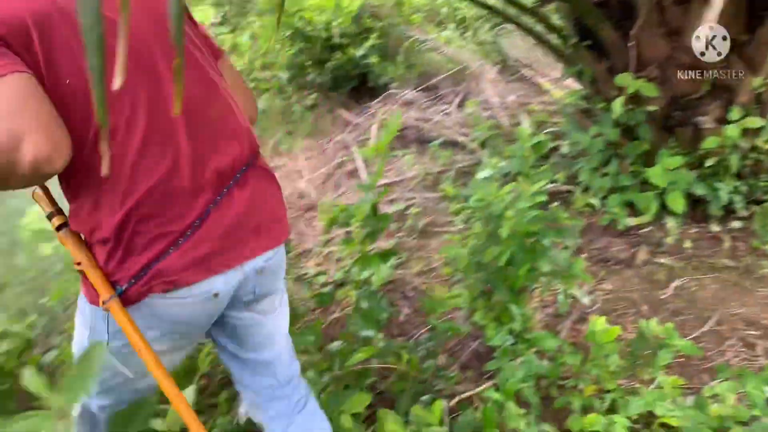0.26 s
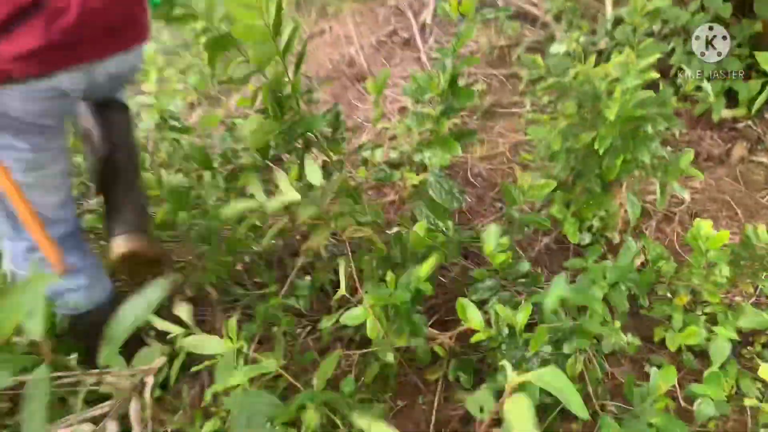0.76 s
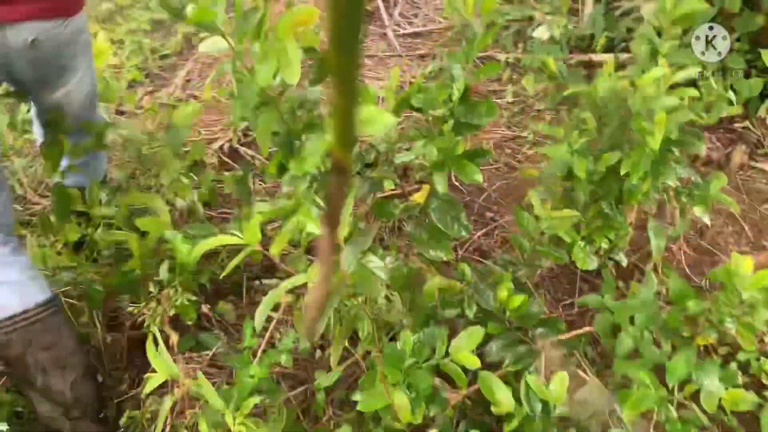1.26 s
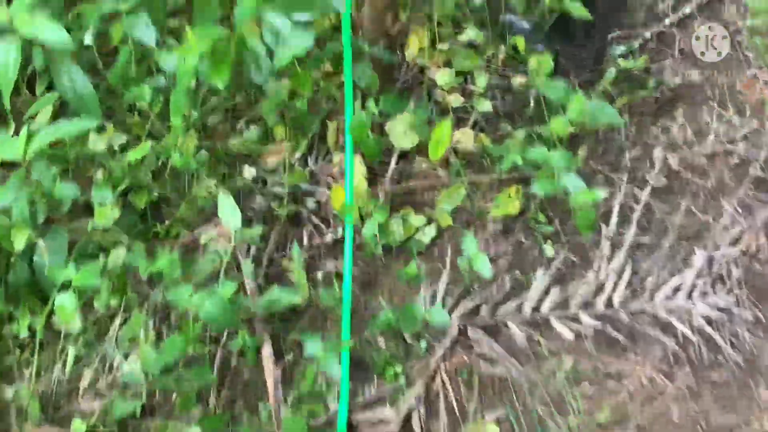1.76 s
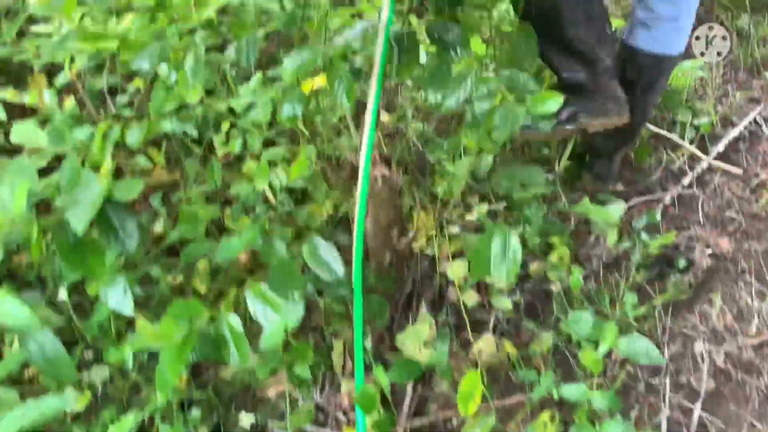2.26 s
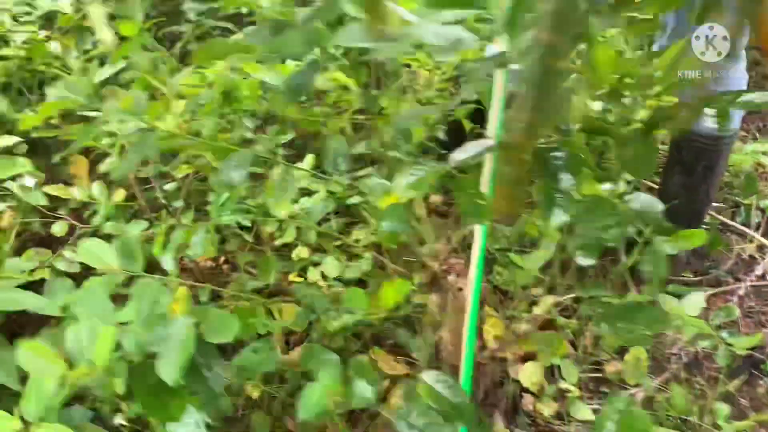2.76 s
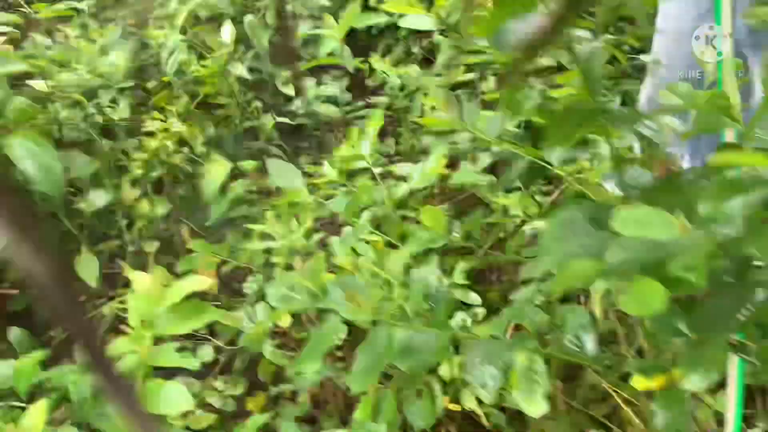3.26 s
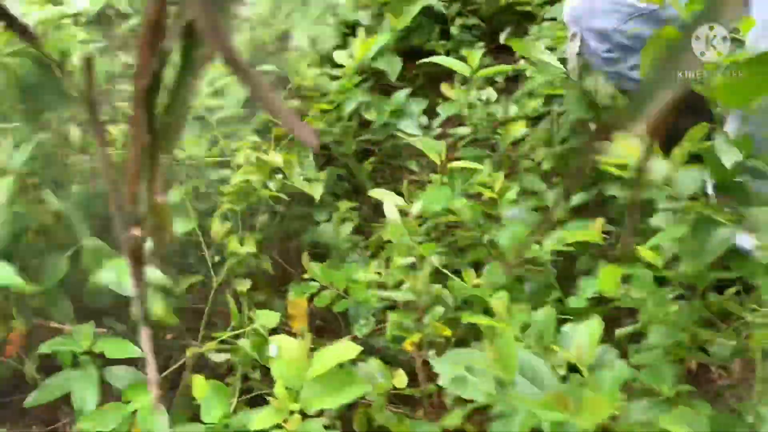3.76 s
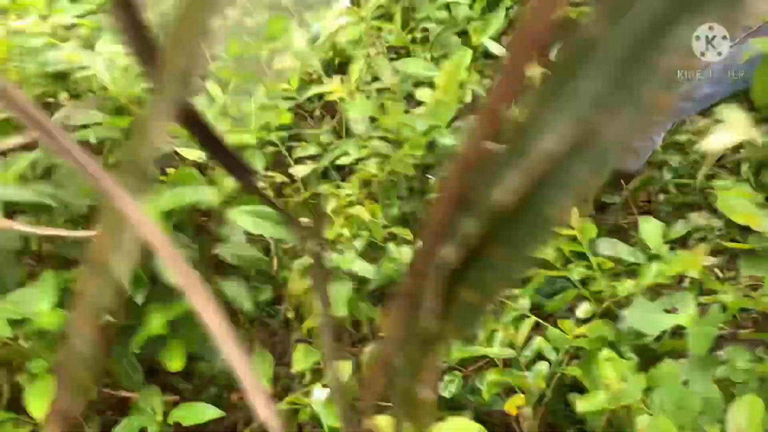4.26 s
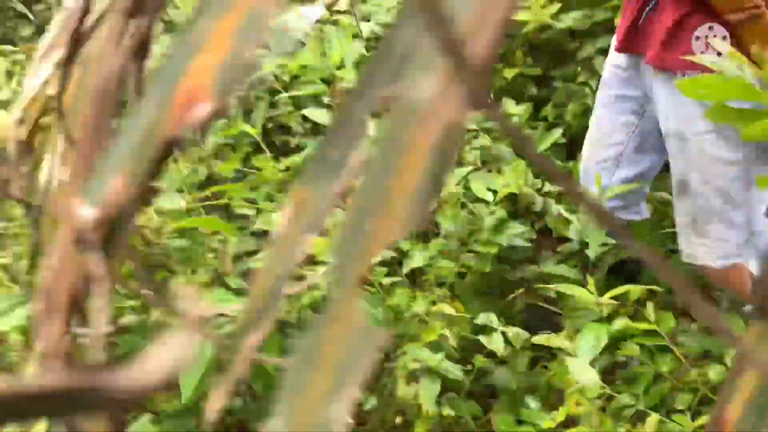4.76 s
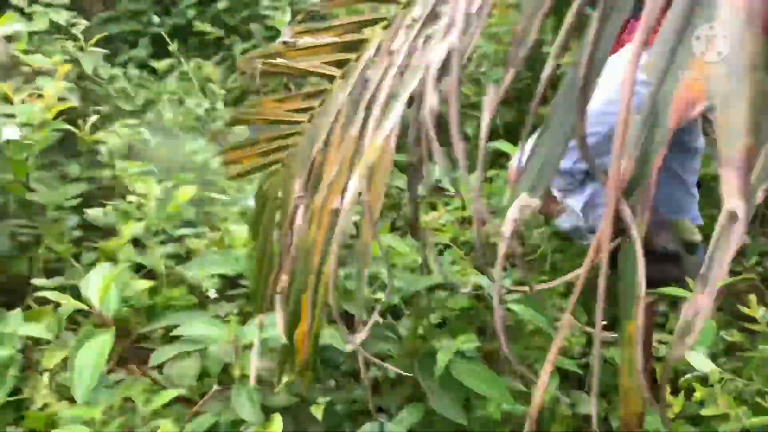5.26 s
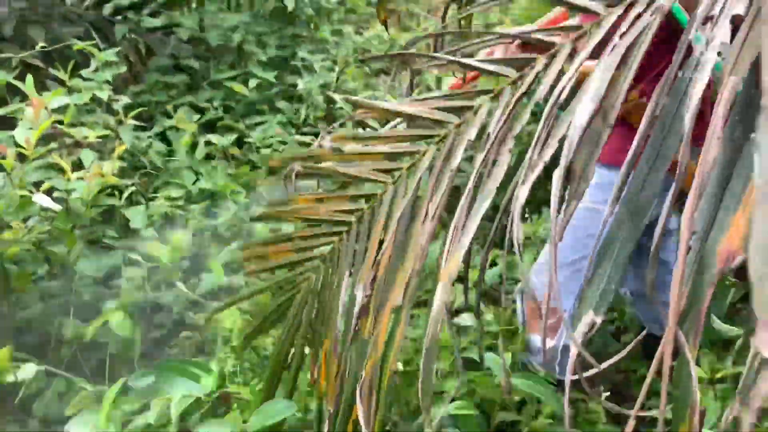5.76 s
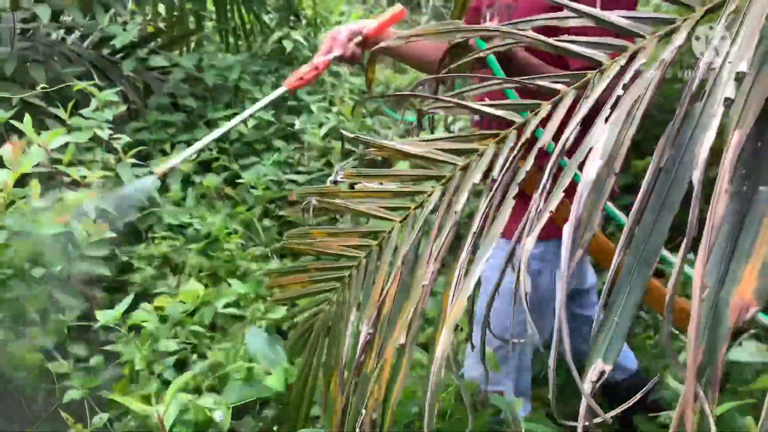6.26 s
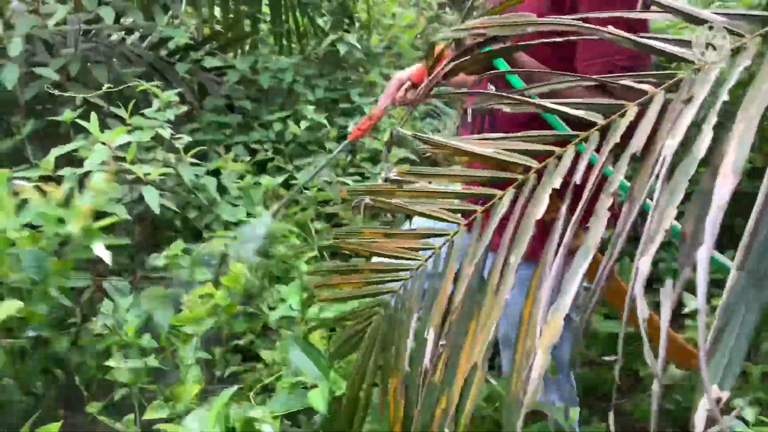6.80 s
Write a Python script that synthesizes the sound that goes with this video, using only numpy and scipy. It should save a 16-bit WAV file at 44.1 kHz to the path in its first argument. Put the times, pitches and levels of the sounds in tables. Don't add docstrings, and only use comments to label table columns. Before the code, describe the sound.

A spray gun hisses over weeds as dry twigs snap underfoot and a slow pump engine thuds far off, with a frond knocking the microphone.

```python
import sys
import numpy as np
from scipy import signal
from scipy.fft import rfft, irfft, next_fast_len
from scipy.io import wavfile
from scipy.ndimage import uniform_filter1d, map_coordinates

SR = 44100
rng = np.random.default_rng(int(sys.argv[2]) if len(sys.argv) > 2 else 0)


def linear_from_db(decibels):
    return 10 ** (np.asarray(decibels, float) / 20)


def put_to_file(sound):
    columns = np.atleast_2d(sound).T
    safe = np.clip(columns, -1, 1)
    whole_steps = np.round(safe * 32767)
    wavfile.write(sys.argv[1], SR, whole_steps.astype(np.int16))


N = 310023
T = np.arange(N) / SR


def along(points, hz):
    f, v = np.transpose(points)
    return np.interp(np.log(hz + 1), np.log(f + 1), v)


def curves(rows):
    s, *cols = np.transpose(rows)
    return [np.interp(T, s, c) for c in cols]


def unit(x):
    return x / np.sqrt(np.mean(x ** 2) + 1e-20)


def wobble(rate):
    return map_coordinates(rng.standard_normal(int(N * rate / SR) + 4), [T * rate])


def swells(rows):
    slow_s = T[::64]
    lift_db = sum(db * np.exp(-((slow_s - s) / width) ** 2 / 2) for s, db, width in rows)
    return np.interp(T, slow_s, lift_db)


def filtered(x, response):
    m = next_fast_len(x.shape[-1] + 4096)
    return irfft(rfft(x, m) * response(np.fft.rfftfreq(m, 1 / SR)), m)[..., :x.shape[-1]]


def rush(spectrum, patchy_db, grit_db, spread=1):
    # frequency in Hz, correlation [-1..1].
    alike = [(100, 0.44), (800, 0.63), (2000, 0.47), (3200, 0.1), (5500, 0.62), (6900, 0.53), (8000, 0.95),
             (16000, 1)]
    pair = rng.standard_normal((2, N)) * linear_from_db(grit_db * wobble(900))
    z = signal.stft(pair, nperseg=512)[2]
    field = uniform_filter1d(rng.standard_normal(z.shape[1:]), 8, 0)
    field = uniform_filter1d(field, 10, 1)
    pair = signal.istft(z * linear_from_db(patchy_db * unit(field)), nperseg=512)[1][:, :N]

    def mid_side(hz):
        angle = np.arccos(np.clip(along(alike, hz), -1, 1)) / 2
        colour = linear_from_db(along(spectrum + [(SR / 2, -120)], hz))
        return colour * [np.cos(angle), np.sin(angle)]

    mid, side = filtered(pair, mid_side)
    return unit(np.array([mid + spread * side, mid - spread * side]))


def rings(rows, attack_s):
    t = np.arange(SR // 10) / SR
    attack = 1 - np.exp(-t / attack_s)
    out = np.zeros(N + len(t))
    for s, db, hz, t60 in rows:
        out[round(s * SR):][:len(t)] += linear_from_db(db - 60 * t / t60) * np.sin(2 * np.pi * hz * t) * attack
    return out[:N]


def mist(sweep_db, flutter):
    # frequency in Hz, level in dB.
    colour = [(3500, -24.5), (5500, -9.5), (7000, -2.5), (8500, -1), (11000, -2), (14000, -2), (15700, -2)]
    # time in seconds, mist level in dB.
    nozzle = [(0, -38), (1.4, -38.5), (1.72, -36), (2.7, -35.5), (3.4, -35.5), (4.8, -34.5), (5.9, -34.5),
              (7.03, -33.5)]
    level_db = curves(nozzle)[0] + sweep_db + 2.5 + 0.49 * flutter
    return linear_from_db(level_db) * rush(colour, patchy_db=1.36, grit_db=1.0)


def leaves(sweep_db, brush_db, flutter):
    # frequency in Hz, level in dB.
    colour = [(500, -12), (1200, -12), (2500, -2), (4200, 0.5), (6000, -3), (7500, 0.5), (10000, -24)]
    # time in seconds, side gain (ratio).
    spread = [(0, .75), (1.3, .85), (1.45, 1.4), (2, 1), (6, 1), (6.06, .3), (6.6, .32), (6.7, .6),
              (6.85, .5), (6.97, 1)]
    level_db = -41 + 0.56 * sweep_db + 0.52 * brush_db + 1.53 * flutter
    return linear_from_db(level_db) * rush(colour, patchy_db=1.5, grit_db=1.5, spread=curves(spread)[0])


def wash(sweep_db, brush_db):
    # frequency in Hz, level in dB.
    colour = [(30, -11), (60, 9), (150, 3.5), (260, 1), (480, -11), (750, -7), (1300, -6), (2500, -11.5)]
    # time in seconds, lift in dB, width in seconds.
    hush = (5.11, -11.5, 0.094)
    # time in seconds, lift in dB, width in seconds.
    lulls = [
        (1.6, 4.5, .05),
        (6.55, -2, 0.4),
    ]
    level_db = -45 + 0.27 * sweep_db + 0.68 * brush_db + swells([hush, *lulls])
    return linear_from_db(level_db) * rush(colour, patchy_db=2.0, grit_db=2.0)


def spray():
    # time in seconds, lift in dB, width in seconds.
    sweeps = [(.15, 1, 0.082), (.5, -5.5, 0.1), (.8, -2, 0.063), (1.07, 5.5, 0.029), (1.95, 4, 0.072),
              (2.1, -2.5, 0.072), (2.42, 2, 0.15), (2.92, 2.5, 0.087), (3.22, 3.5, 0.12), (3.73, 7.5, 0.12),
              (4.1, 2.5, 0.07), (4.47, 6.5, 0.12), (4.93, -4, 0.098), (5.6, 2.5, 0.08), (6.35, 2.5, 0.066),
              (7.0, 2.5, 0.066)]
    # time in seconds, lift in dB, width in seconds.
    brush = [(.1, 3, 0.017), (.87, 9, 0.12), (1.15, 0, .12), (1.48, -3, 0.036), (1.85, 2.5, .15),
             (2.47, 2.5, 0.081), (3.03, 5.5, 0.075), (3.35, 2.5, 0.031), (3.75, 5, 0.13), (4.47, 0.5, 0.1),
             (4.75, 4.5, 0.31), (5.17, 4, 0.1), (5.55, 2, 0.15), (6.2, -1, 0.11)]
    sweep_db, brush_db = swells(sweeps), swells(brush)
    flutter = wobble(14)
    return mist(sweep_db, flutter) + leaves(sweep_db, brush_db, flutter) + wash(sweep_db, brush_db)


def engine():
    # first firing in seconds, firings per second.
    firing = [
        (-.0055, 14.42),
        (1.5578, 14.438),
    ]
    # time in seconds, thump peak in dB, left minus right in dB.
    loudness = [(0, -23, 0.5), (1.4, -23.5, 0.5), (1.7, -24.5, -5), (3.5, -25, -4), (5.1, -27, -6),
                (5.5, -25.5, -5.5), (7.03, -27, -5.5)]
    # delay in ms, frequency in Hz, length in ms, level in dB.
    pulses = [(-15, 169, 4.7, -18), (1.5, 99.7, 4.87, -1), (15.5, 96, 5.5, -10.5), (7.5, 142.6, 14, -9.5),
              (30, 124, 7.6, -32), (2, 217, 45, -30)]
    t = np.arange(-1300, 3300) / SR
    thump = np.zeros(len(t))
    for ms, hz, long_ms, db in pulses:
        bell = np.exp(-((t * 1000 - ms) / long_ms) ** 2 / 2)
        thump -= linear_from_db(db) * bell * np.cos(2 * np.pi * hz * (t - ms / 1000))
    count = np.arange(90)
    (first_s, rate_hz), (again_s, rate_after_hz) = firing
    times_s = np.r_[(first_s + count / rate_hz)[:23], again_s + count / rate_after_hz]
    chance = rng.standard_normal((len(times_s), 2))
    hunting_s = .0005 * np.sin(2 * np.pi * times_s * 3.3)
    at = np.round((times_s + hunting_s + .0003 * chance[:, 0]) * SR).astype(int) + 1300
    kicks = np.bincount(at, linear_from_db(0.41 * chance[:, 1]), N + 2 * SR)
    thuds = signal.fftconvolve(kicks, thump)[2600:2600 + N]
    level_db, pan_db = curves(loudness)
    return thuds * linear_from_db([level_db + pan_db / 2, level_db - pan_db / 2])


def litter():
    pick = rng.random((70, 4))
    return [(2.5 * s, -39 + 9 * size ** 2, 2000 + 4400 * pitch, -16, 8 * bright, -8)
            for s, size, pitch, bright in pick if abs(2.5 * s - 1.55) > .16]


def ticks():
    # start in seconds, peak in dB, frequency in Hz, t60 in seconds.
    stem_ticks = [(.1048, -18, 2600, .005), (.186, -24, 7500, .005), (.238, -20, 7600, 0.048),
                  (.2838, -24, 6500, .01), (.3282, -27, 7100, .012), (.4648, -26, 8000, .006),
                  (.58, -13, 7600, .004), (.7302, -7, 8200, .006), (.7467, -13, 8200, 0.0033),
                  (.8746, -1.5, 9500, .008), (.8833, -11, 4500, 0.0054), (.911, -21, 9000, .006),
                  (.9215, -28, 3800, 0.033), (.9403, -8.5, 4000, .006), (1.049, -24, 8000, .006),
                  (1.1603, -32, 8000, .006), (1.219, -18, 9500, .006), (1.5938, -33, 6000, .008),
                  (1.9098, -10, 6000, 0.0033), (1.61, -38, 5000, .005), (2.4085, -11, 4800, 0.0043),
                  (3.291, -7, 9800, .006), (3.369, -3, 9800, 0.018), (3.4725, -13, 10400, .004),
                  (4.0198, -18.5, 1200, 0.0058), (4.061, -22, 4500, .008), (4.104, -28.5, 1000, .01),
                  (4.13, -25, 2200, .008), (4.7183, -21, 1300, .012), (4.898, -20.5, 1900, .014),
                  (5.006, -31, 2500, .006), (5.083, -13, 9000, .004)]
    t = np.arange(1024) / SR
    out = np.zeros(N + len(t))
    noises = rng.standard_normal((len(stem_ticks), len(t)))
    for (s, db, hz, t60), noise in zip(stem_ticks, noises):
        puff = signal.lfilter(*signal.iirpeak(hz, 1.2, SR), noise * linear_from_db(-60 * t / t60))
        out[round(s * SR):][:len(t)] += linear_from_db(db) * puff / np.abs(puff).max()
    return out[:N]


def twigs():
    # start in seconds, peak in dB, pitch in Hz, wood in dB, crackle in dB.
    clean = [(0.245, -26.5, 4000, -17, 6), (0.2502, -24.5, 1840, -4, 0), (0.4649, -28.5, 5130, -3.5, 2),
             (0.5705, -30, 5230, -15, -1), (.579, -24, 5150, -24, 6), (.746, -16, 3680, -12.5, -0.5),
             (.8042, -29, 3610, -21, -12), (0.846, -27, 3490, -21, -7), (0.8825, -16.5, 2210, 0, 4.5),
             (0.9207, -15.5, 3200, -9, -12), (0.94, -17.5, 3250, -29, 1.5), (1.417, -29.5, 4340, -26, 4),
             (1.5926, -41, 6400, -29, -8), (1.992, -23.5, 4950, -28, 2), (2.0898, -27, 4730, -25, 3),
             (2.105, -25, 2850, -10, -9), (3.29, -27.5, 2370, -45, 8), (4.8962, -22, 1590, -1, -17),
             (5.0256, -24, 1890, -16, -16), (5.0454, -20.5, 1900, -26, -13), (5.082, -24.5, 5740, -28, 3),
             (5.134, -21, 6300, -29, -10), (5.198, -28, 5100, -18, -8), (5.218, -29, 6000, -23, -6)]
    # start in seconds, peak in dB, crackle in dB.
    stems = [(.299, -37, 11), (0.566, -29, -1), (.5849, -28, 2), (.728, -30, 12), (0.798, -40.5, 14.5),
             (1.0618, -33, 10.5), (1.198, -30, 7.5), (1.218, -30, 12), (1.227, -39, 13),
             (1.2700, -37.5, 10), (1.3816, -45.5, 19.5), (1.5013, -46, 7), (1.571, -49.5, 5),
             (2.0466, -33, 9.5), (2.097, -39, 10), (3.472, -43.5, 18), (4.1017, -29.5, 9.5)]
    # start in seconds, peak in dB, pitch in Hz, wood in dB.
    taps = [(0.3219, -24, 3310, -19), (1.0125, -29, 2320, -11), (1.0755, -32, 6420, -12),
            (1.6092, -44, 5440, -14), (1.755, -24, 4970, -21), (1.857, -31, 4730, -18),
            (2.036, -23.5, 5800, -20), (2.1538, -41, 5800, 4), (2.1894, -42, 5200, -15),
            (2.429, -37, 1810, 5), (2.4571, -32, 1760, 7), (2.474, -37, 4730, 5), (3.459, -31, 2560, -14),
            (3.699, -21, 4050, -24), (4.0173, -27.5, 1500, 2), (4.7165, -32, 1780, 7.5),
            (4.737, -37, 1820, 11), (5.445, -34.5, 1820, 6)]
    # start in seconds, peak in dB, pitch in Hz, wood in dB, crackle in dB.
    breaks = [(0.8746, -20.5, 3580, -1, 9.5), (1.706, -10.5, 4270, -43, -4), (1.9084, -11, 5880, -38, -12),
              (2.408, -17.5, 4730, -11, -10), (3.367, -17.5, 2320, -11, 3)]
    # delay in seconds, peak in dB, pitch in Hz, wood in dB, crackle in dB.
    after = [
        (.0065, -32, 4660, -22, 6.5),
        (0.0137, -38, 4800, -25, 8.5),
    ]
    rows = [(*row, 0.5) for row in breaks]
    rows += [(*row, -2.5) for row in clean]
    rows += [(row[0] + s, *rest, 8.5) for row in breaks for s, *rest in after]
    rows += [(s, db, 5520, -8, crackle_db, 2) for s, db, crackle_db in stems]
    rows += [(*row, -17, -3) for row in taps]
    return rows + litter()


def snaps():
    t = np.arange(SR // 8) / SR
    burst = (1 - np.exp(-t / 0.00037)) ** 2 * linear_from_db(-60 * t / 0.0091)
    wood, crack, crackle = np.zeros((3, 2, N + len(t)))
    for s, db, hz, wood_db, crackle_db, rustle_db in twigs():
        noise = rng.standard_normal((5, len(t)))
        grain_db = 1.7 * np.repeat(noise[3, ::40], 40)[:len(t)]
        splinters = linear_from_db(rustle_db - 7.0 - 60 * t / 0.055 + grain_db) * (t > .001)
        size = linear_from_db(db) * (burst + splinters)
        lag = round(2.5 * noise[3, 1])
        ports = lambda x: np.array([x, np.roll(x, lag)])
        ring = 4.7 * uniform_filter1d(noise[4], size=20) * np.cos(2 * np.pi * hz * t)
        at = slice(round(s * SR), round(s * SR) + len(t))
        wood[:, at] += linear_from_db(wood_db + 17.0) * ports(size * noise[0])
        crack[:, at] += linear_from_db(7.5) * ports(size * (1.15 * noise[1] + .5 * ring))
        crackle[:, at] += linear_from_db(crackle_db + 18.5) * size * noise[2]

    def band(lo_hz, hi_hz):
        return lambda hz: (1j * hz / lo_hz / (1 + 1j * hz / lo_hz)) ** 4 / (1 + 1j * hz / hi_hz) ** 4

    out = filtered(wood, band(305, 2660)) + filtered(crack, band(1230, 12200))
    return (out + filtered(crackle, band(7000, 16600)))[:, :N]


def pings():
    # start in seconds, peak in dB, frequency in Hz, t60 in seconds.
    wood_rings = [(.579, -18, 7400, .006), (.7285, -15, 7800, .006), (.7465, -23, 3700, .008),
                  (.8745, -9.5, 950, .012), (.8745, -18, 3600, .008), (.8817, -16, 2200, .01),
                  (.921, -27, 950, .03), (.9402, -9.5, 3200, .007), (1.07, -38, 1050, .05),
                  (1.143, -35, 950, .03), (1.162, -38, 850, .03), (1.178, -34, 900, .03),
                  (1.5935, -38, 4300, .008), (1.5935, -36, 6500, .008), (1.7065, -9, 2100, .009),
                  (1.7068, -13, 3450, .012), (1.7066, -9, 4400, .01), (1.9095, -17, 2000, .01),
                  (1.9095, -17, 4100, .01), (2.408, -21, 2800, .008), (3.29, -24, 2300, .008),
                  (3.3668, -14, 2000, .009), (3.3672, -15, 1400, .012), (3.4595, -27, 2800, .006),
                  (3.472, -20, 10300, .005), (5.082, -22, 6700, .006)]
    right = rings(wood_rings, attack_s=.0003)
    return np.array([np.roll(right, 7), right])


def drag():
    # peak time in seconds, peak in dB, rise and fall in seconds per 20 dB.
    rub = [(.925, -48, .03, .045), (1.19, -49, 0.22, 0.035), (1.348, -37.5, .006, 0.063),
           (2.43, -46, .04, .06), (2.48, -39, 0.072, 0.025), (4.723, -38, 0.0023, 0.056),
           (4.739, -31, 0.015, 0.037), (4.81, -33, .015, .05), (4.85, -38, 0.049, 0.043),
           (4.906, -19.5, 0.006, 0.0046), (5.03, -42.5, 0.039, 0.08), (5.09, -48, .08, .015)]
    # frequency in Hz, level in dB.
    colour = [(120, -32), (220, -5), (330, -8), (480, -14), (750, -22), (1300, -43), (3000, -42)]
    strokes = sum(linear_from_db(db - 20 * np.where(T < s, (s - T) / rise, (T - s) / fall)) for s, db, rise, fall in rub)
    return strokes * linear_from_db(4 * wobble(90)) * rush(colour, patchy_db=3, grit_db=3, spread=.5)


def shake():
    # time in seconds, level in dB.
    boom = [(4.717, -90), (4.72, -15.5), (4.78, -17), (4.8, -24), (4.87, -24), (4.89, -27), (4.915, -25),
            (4.93, -43), (4.94, -90)]
    # frequency in Hz, level in dB.
    colour = [(30, -35), (55, 11.5), (80, 7), (130, -3), (175, -1.5), (240, -19), (400, -64)]
    return linear_from_db(curves(boom)[0]) * rush(colour, patchy_db=1.5, grit_db=1.0, spread=0.71)


def handling():
    # start in seconds, peak in dB, frequency in Hz, t60 in seconds.
    knocks = [(1.295, -35, 250, .04), (1.347, -36, 650, .03), (2.457, -30, 288, .022),
              (3.367, -25.5, 213, .091), (3.643, -36, 284, .062), (4.7192, -10, 310, .018),
              (4.724, -15, 75, .15), (4.737, -16, 190, .052), (4.758, -16, 109, .14), (4.765, -19, 140, .1),
              (4.809, -18, 172, .05), (4.81, -30, 950, .02), (4.845, -28, 850, .03), (4.85, -28, 520, .04),
              (4.883, -26, 380, .03), (4.899, -12, 760, .05), (4.901, -15, 300, .035),
              (4.907, -9, 97, .065), (5.027, -28, 420, .03), (5.05, -33, 380, .03)]
    # start in seconds, peak in dB, frequency in Hz, t60 in seconds.
    more_knocks = [(2.424, -36, 447, 0.026), (2.435, -34, 700, .02), (2.4585, -24, 900, 0.013),
                   (2.469, -32, 600, .02), (2.475, -28, 650, .025), (2.484, -29, 850, 0.024),
                   (4.7195, -24, 805, 0.022), (4.738, -31, 900, .02), (4.745, -23, 560, .05),
                   (4.768, -21, 135, .12), (4.776, -36, 1150, .03), (4.826, -31, 620, .04),
                   (4.835, -36, 1300, .02), (4.856, -40, 540, .03), (4.88, -29, 500, .02),
                   (4.89, -28, 650, .02), (4.9, -20, 1350, .02), (4.901, -19.5, 594, 0.044),
                   (.8835, -24, 900, .012), (.875, -34, 544, .02), (4.906, -33, 330, 0.023)]
    lag_s = 16 / SR

    def case_to_ports(hz):
        low_cut = (1j * hz / (28 + 1j * hz)) ** 3
        return low_cut * np.exp(-1j * np.pi * hz * lag_s * np.array([[1], [-1]]))

    return filtered(drag() + shake() + rings(knocks + more_knocks, attack_s=.0001), case_to_ports)


def scene():
    # time in seconds, gain (ratio).
    fade = [(0, 0.87), (1.4, 0.79), (1.49, 0.099), (1.511, .04), (1.556, 0.048), (1.6, 0.22), (1.71, 0.71),
            (7.03, 1)]
    field = (spray() + engine() + handling()) * curves(fade)[0]
    return field + ticks() + snaps() + pings()


def low_pass(x):
    return signal.sosfilt(signal.butter(12, 16660, fs=SR, output="sos"), x)


def record(dry):
    # frequency in Hz, lead in half turns.
    lead = [
        [(0, 0), (2800, .92), (3900, .45), (5300, 1), (8600, 2), (11600, 3), (13100, 3), (14700, 4)],
        [(0, -.12), (1900, -.15), (4500, -2), (7150, -3), (9300, -2), (11700, -1), (13800, 0), (16100, 1)],
    ]
    # frequency in Hz, lead in half turns.
    lead_turned = [(0, -.12), (1900, -.15), (3000, -.6), (3900, -1), (4800, -2), (7150, -3), (9300, -2),
                   (11700, -1), (13800, 0), (16100, 1)]
    turn_s = (6.6, 6.75)
    silence_s = (1.511, 1.556)
    top_hz, rumble_hz, ceiling = 15850, 24, .86

    def ports(points):
        def response(hz):
            half_turns = np.interp(hz, *np.transpose(points))
            band = (hz < top_hz) * (hz / np.hypot(rumble_hz, hz)) ** 6
            return np.exp(.5j * np.pi * half_turns * np.array([[-1], [1]])) * band
        return response

    first, second, turned = (filtered(dry, ports(points)) for points in lead + [lead_turned])
    second = second + np.interp(T, turn_s, [0, 1]) * (turned - second)
    joined = first * (T < silence_s[0]) + second * (T > silence_s[1])
    joined = joined / (1 + np.abs(joined / ceiling) ** 6) ** (1 / 6)
    return low_pass(joined)


dry = scene()
out = record(dry)
put_to_file(out)
```